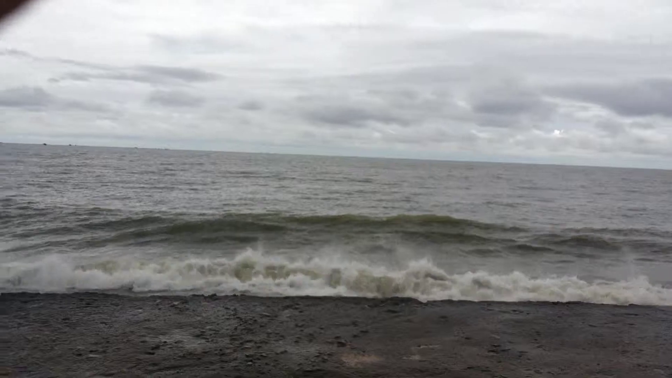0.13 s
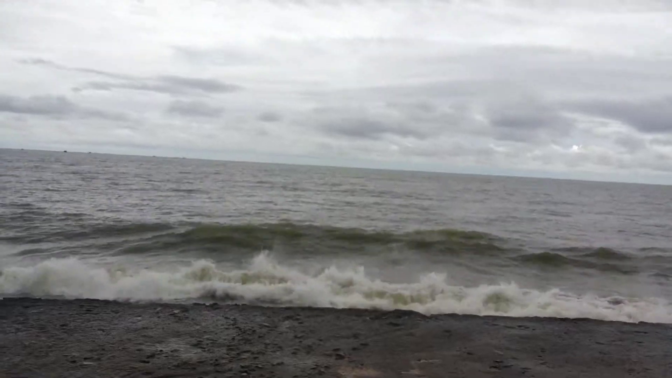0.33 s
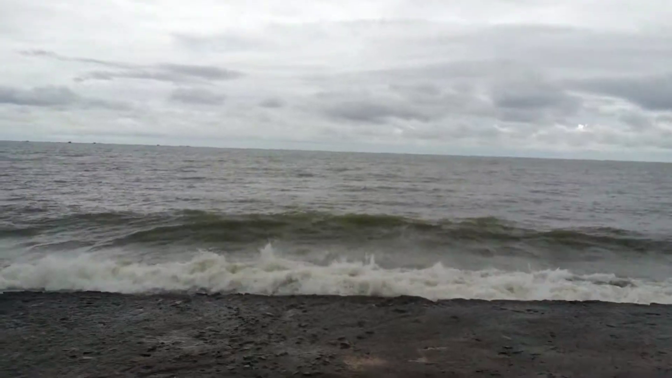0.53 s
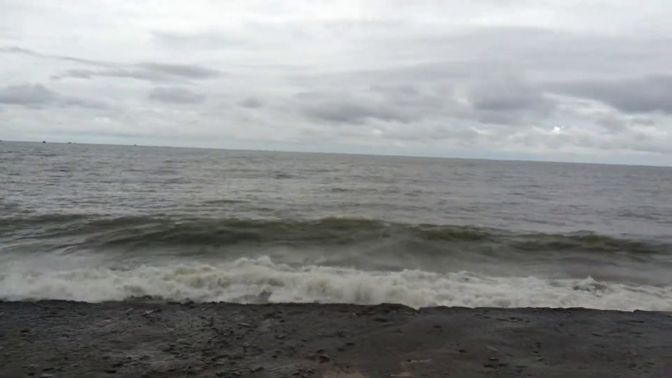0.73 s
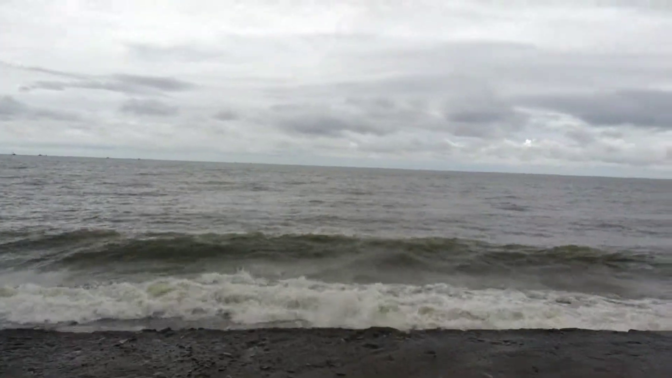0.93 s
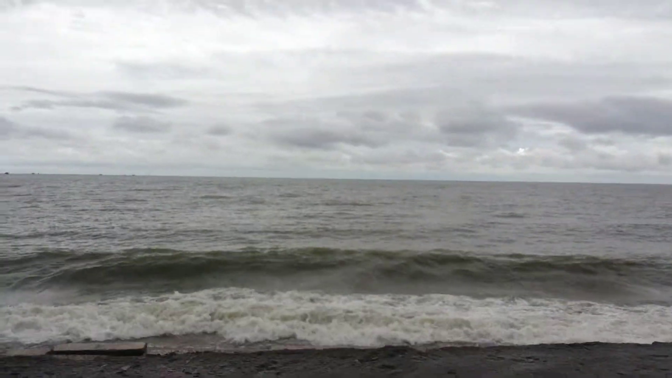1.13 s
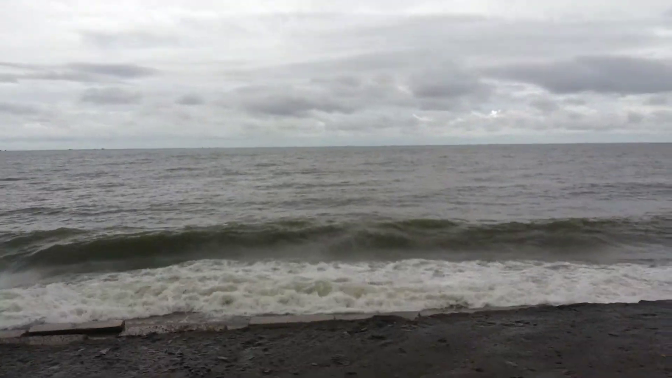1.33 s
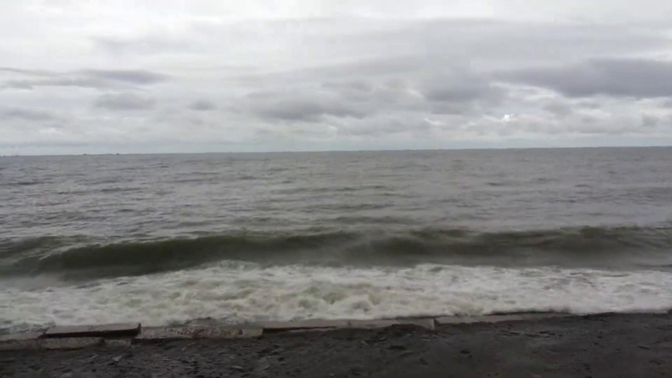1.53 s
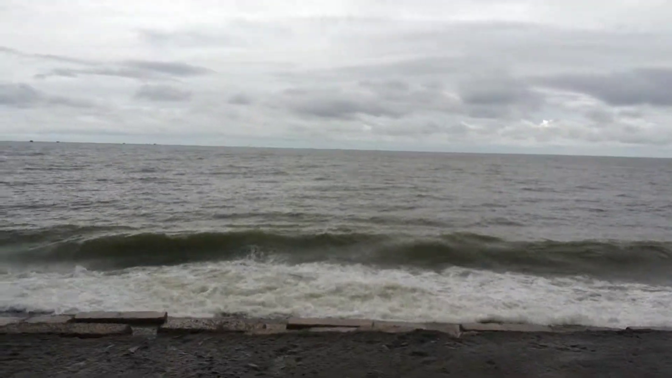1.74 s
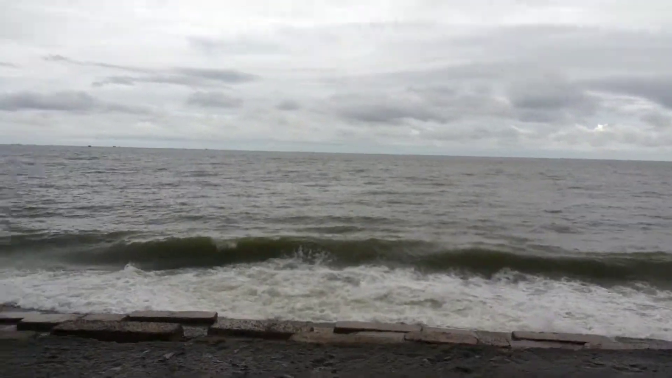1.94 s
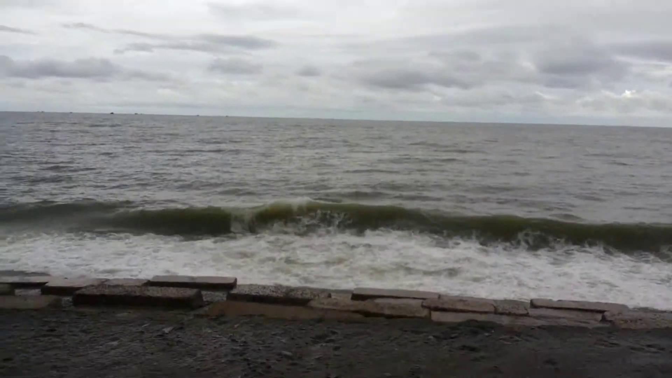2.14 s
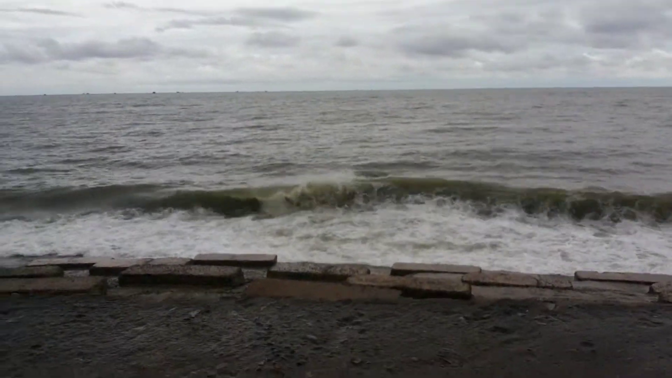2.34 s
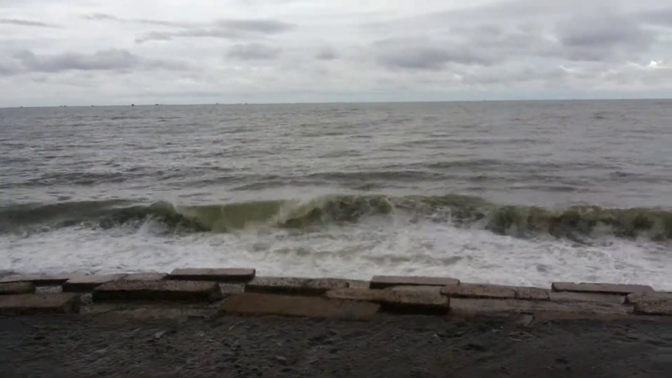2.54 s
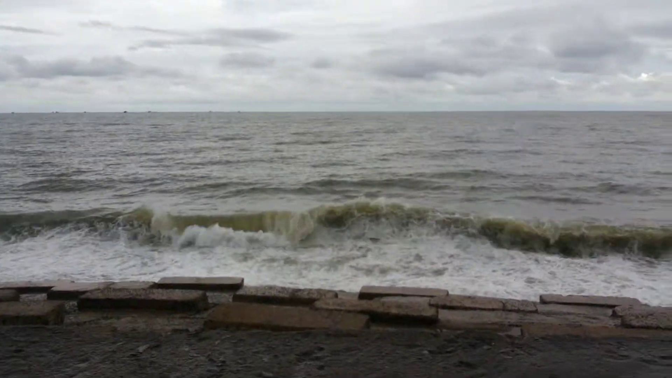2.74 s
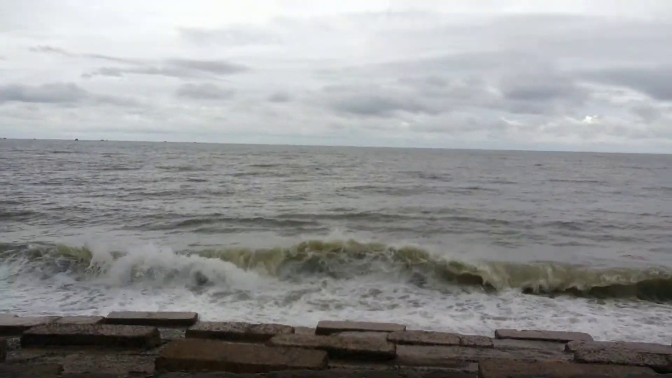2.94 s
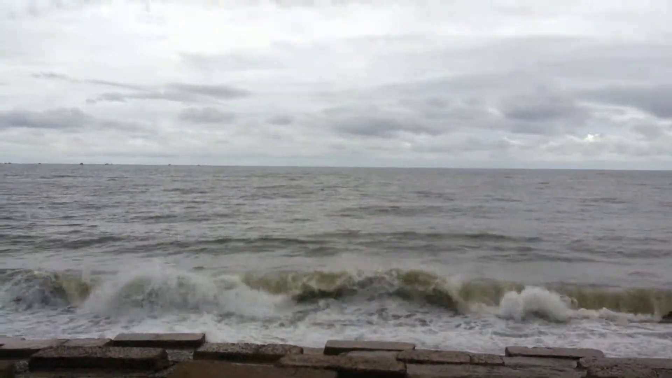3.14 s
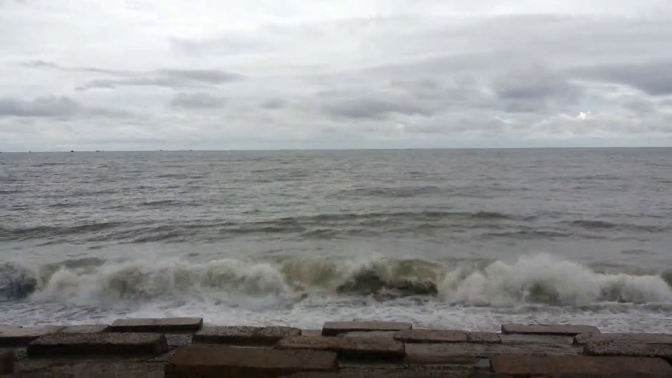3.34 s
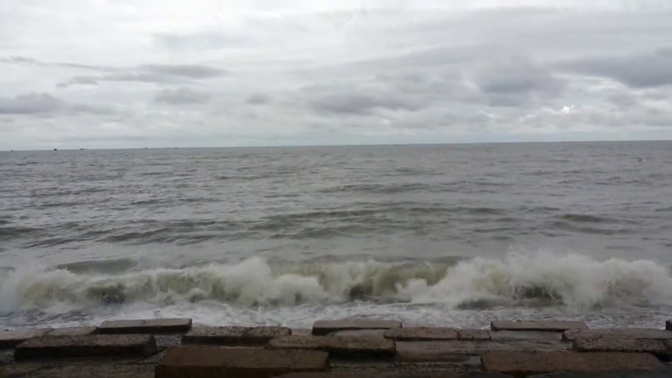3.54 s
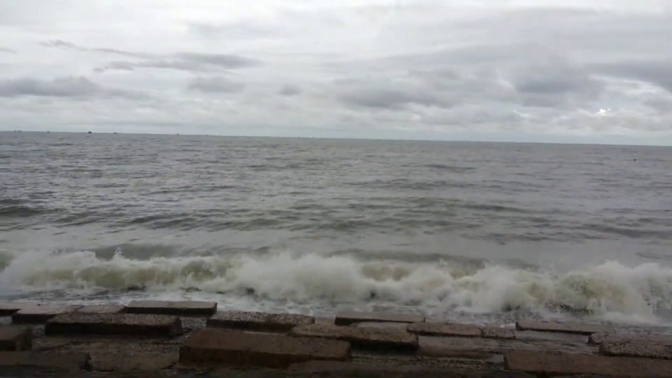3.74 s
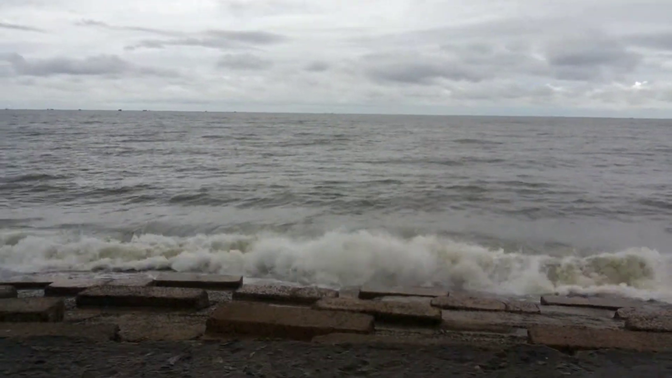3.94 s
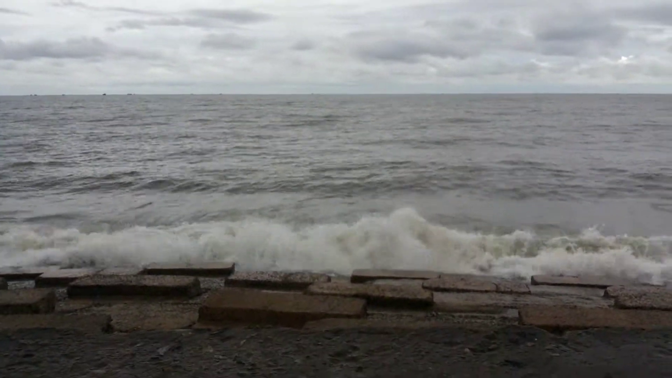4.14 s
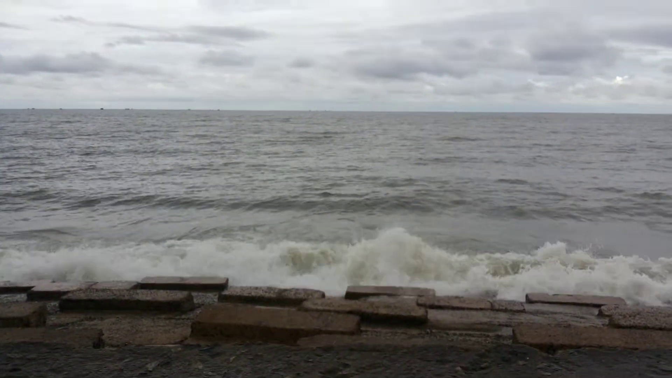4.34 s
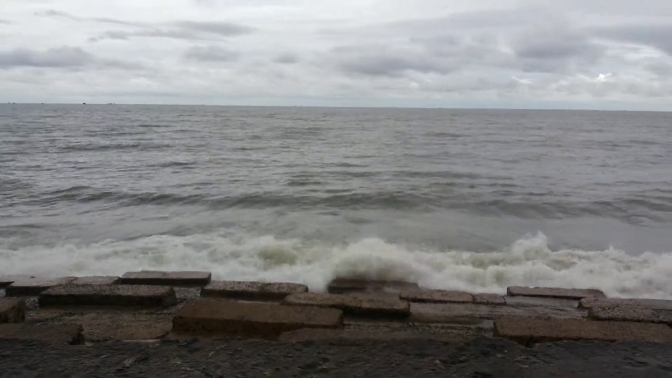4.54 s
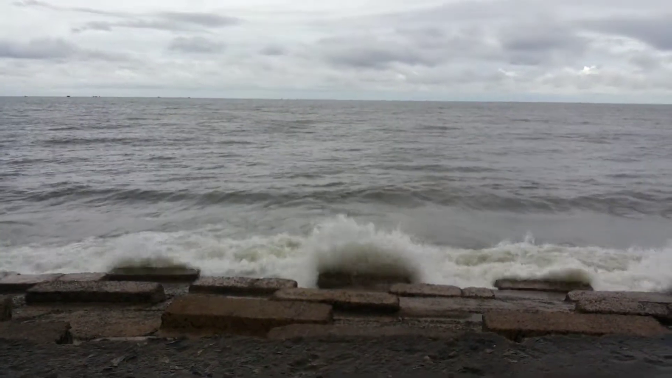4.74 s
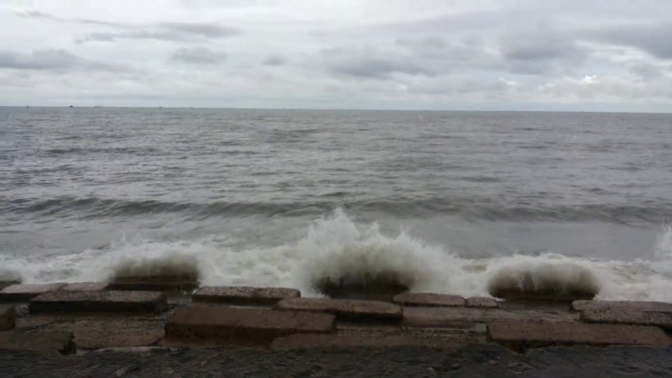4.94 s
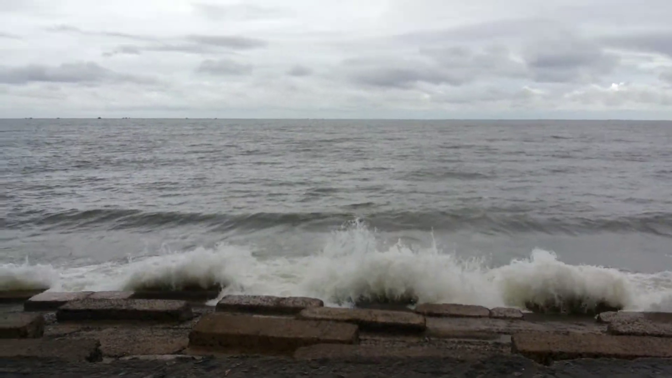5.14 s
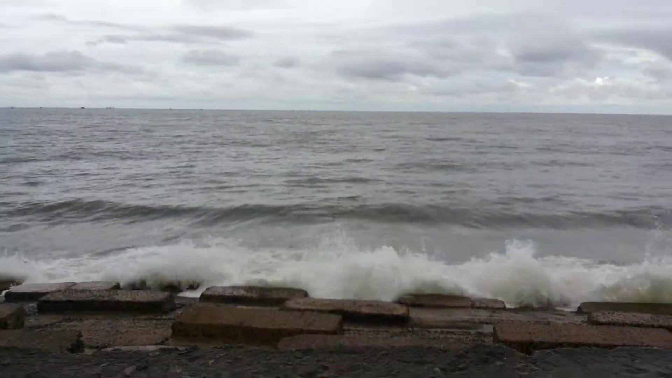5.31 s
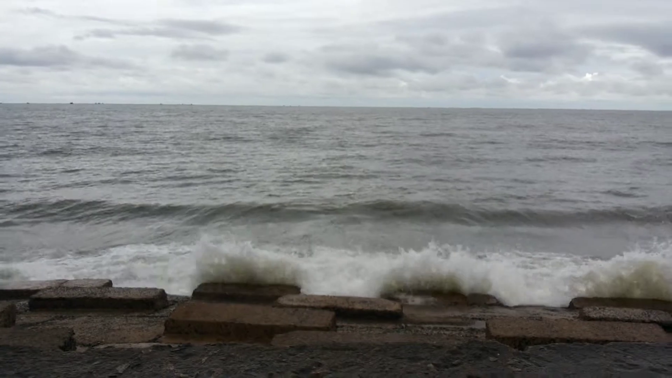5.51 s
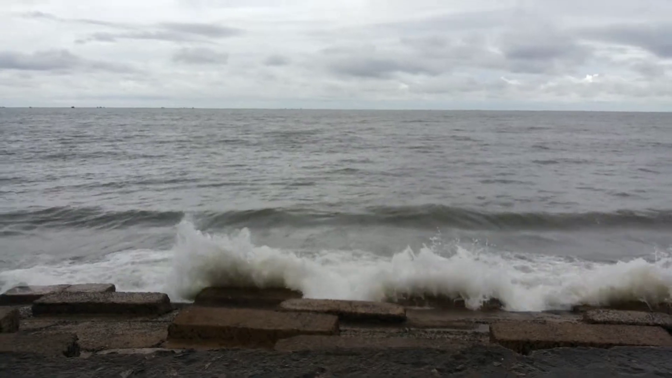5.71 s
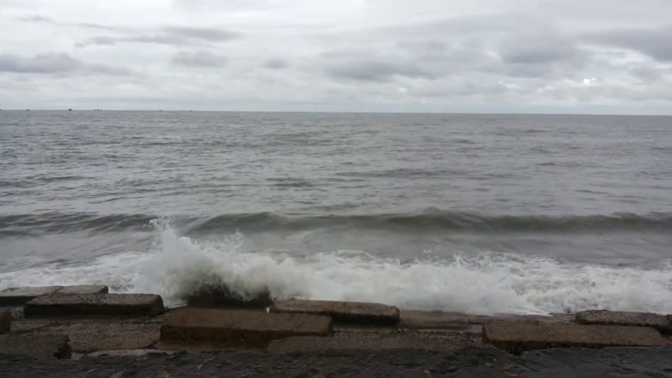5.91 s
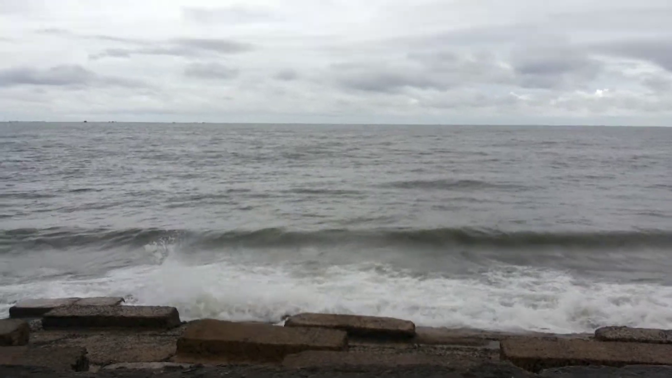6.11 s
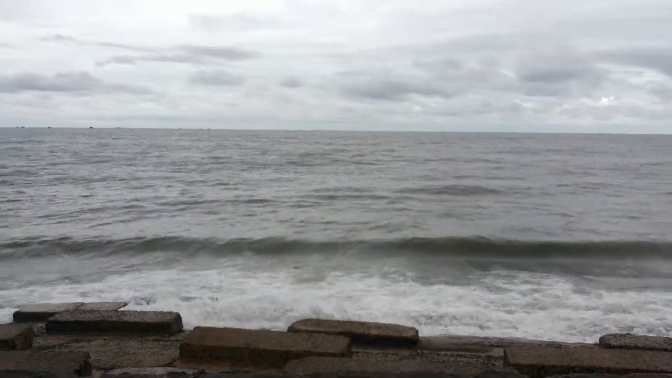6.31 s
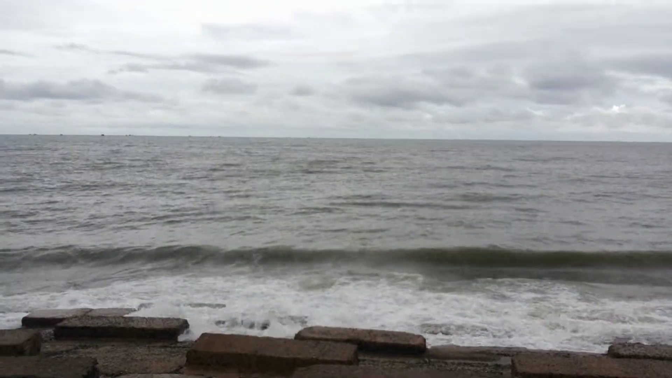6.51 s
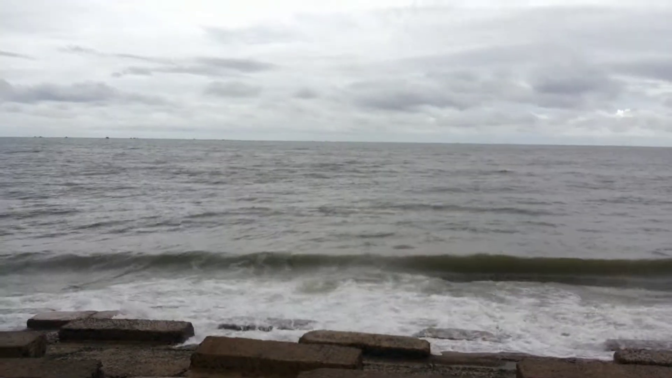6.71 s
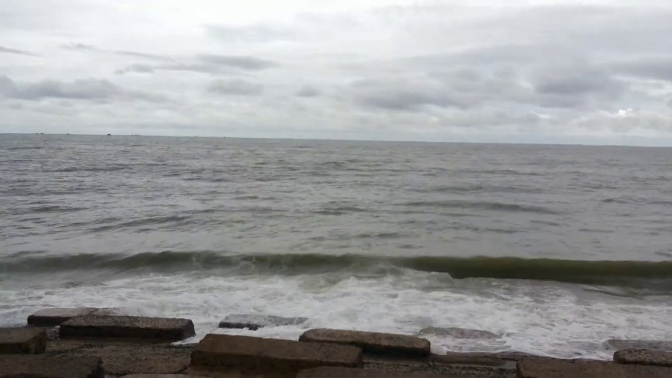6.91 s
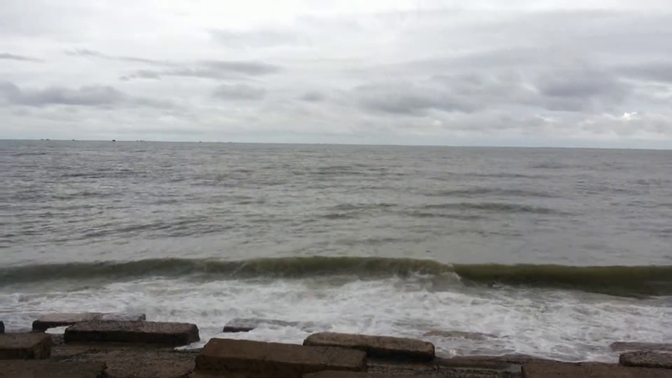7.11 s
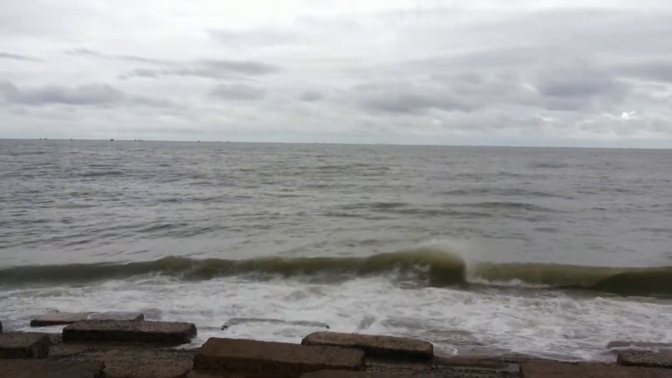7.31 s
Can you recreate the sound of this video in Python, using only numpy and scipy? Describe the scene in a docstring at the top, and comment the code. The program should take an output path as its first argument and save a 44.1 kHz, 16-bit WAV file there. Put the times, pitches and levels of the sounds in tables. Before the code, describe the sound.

On a windy shore, a single microphone picks up churning, hissing sea surf and irregular low thumps of wind. A few gritty shoe scuffs pass nearby, followed by one hollow stony knock with a brief grind. A wave crashes and swells, throwing spray, then water slaps against the seawall slabs. Near the end the hardest gusts buffet the microphone and the surf eases.

```python
"""Surf washes up a stone seawall; the next wave breaks and slaps against the slabs.
Air pockets roar, smaller bubbles churn and wash, foam fizzes, falling water sprays.
Gusts hit the single microphone in short puffs and overload it. Close by, shoes scuff
over grit and something hollow, perhaps a loose slab, knocks and scrapes."""
import sys
import numpy as np
from scipy import signal
from scipy.fft import rfft, irfft, next_fast_len
from scipy.io import wavfile
from scipy.ndimage import uniform_filter1d, map_coordinates

SR = 44100
rng = np.random.default_rng(int(sys.argv[2]) if len(sys.argv) > 2 else 0)


def log_audio(samples):
    """Write samples as a 16-bit WAV file to the path given in sys.argv[1]."""
    # one column per channel
    frames = np.atleast_2d(samples).T
    # limit to full scale, then quantise
    limited = np.clip(frames, -1, 1)
    pcm = np.round(limited * 32767).astype(np.int16)
    wavfile.write(sys.argv[1], SR, pcm)


N = 324576
TIME_S = np.arange(N) / SR
SPLASH_ATTACK_S = .014

# surf strength; one wave washes out, the next breaks and drains: t/s, level/dB
SURF_LEVEL = [(.44, -27.5), (1.15, -27), (1.6, -31.5), (2.15, -28.5), (2.6, -32), (2.92, -25.5),
              (3.06, -27), (3.45, -22.5), (4.0, -24.5), (4.65, -23), (5.24, -30), (5.6, -28.5),
              (6.3, -27.5), (6.8, -30), (7.08, -31.5), (7.3, -30.5)]
# foam bursting behind each wave: t/s, level/dB
FOAM_LEVEL = [(.44, -36), (1.1, -30.5), (1.6, -32.5), (2.25, -29), (2.55, -31.5), (3.8, -30), (4.65, -30),
              (5.2, -34.5), (6.7, -35), (7.1, -38.5)]
# spray from wash-up, breaking wave and wall slap: start/s, build-up/s, peak level/dB, fall/s
SPRAY_SURGES = [(.4, .35, -35.5, 0.89), (3.095, 0.55, -26, 0.53), (5.39, 0.12, -33.5, .5)]
# water landing on sea or wall: start/s, lift/dB, length/s
SPLASHES = [(0.708, 3.5, 0.11), (3.09, 2, 0.12), (3.31, 1.5, .05), (3.573, 2.5, 0.063), (3.748, 3, 0.1),
            (4.046, 1, 0.07), (4.946, 2.5, 0.075), (5.39, 4.5, .26), (5.868, 2, 0.18), (6.171, 3.5, .075)]
# gusts: centre/s, level/dB, length/s
GUSTS = [(0.793, -16, 0.026), (0.883, -27, 0.075), (1.108, -21, 0.089), (1.266, -23.5, 0.043),
         (1.498, -29, 0.065), (1.802, -15, 0.074), (2.053, -21.5, 0.16), (2.335, -24.5, 0.03),
         (3.55, -26, 0.1), (4.417, -20.5, 0.092), (4.65, -30.5, 0.26), (4.974, -22.5, 0.055),
         (5.63, -18.5, 0.17), (5.773, -24, 0.02), (5.911, -17, 0.064), (5.991, -10, 0.044),
         (6.035, -11, 0.032), (6.229, -17, 0.16), (6.608, -19.5, .19)]
# hardest single eddies: t/s, level/dB
THUMPS = [(.729, -11.5), (1.17, -13), (1.825, -6.5), (2.025, -8), (2.038, -15), (3.477, -14.5),
          (3.507, -13.5), (5.524, -10.5), (5.62, -12), (5.685, -8.5), (5.989, -3), (6.046, -5.5),
          (6.235, -8.5), (6.259, -5.5), (6.278, -8), (6.468, -15), (6.591, -9)]
# sole strokes: peak/s, level/dB, rise/s, fall/s
SCUFFS = [(1.769, -18, 0.017, 0.043), (1.85, -24.5, .015, 0.047), (2.082, -18, 0.029, 0.016),
          (2.135, -23.5, .012, 0.02), (2.746, -21, 0.0047, 0.027), (2.822, -19, 0.024, 0.046)]
# hollow slab modes: base f/Hz, base width/Hz, gain/dB
SLAB_MODES = [(345, 84, 2.5), (743, 60, 1), (1380, 30, 3.5), (1690, 40, -3), (1850, 40, 0.5),
              (2750, 150, -3), (3310, 74, -6)]
# longest slab overtones: f/Hz, level/dB, t60/s
SLAB_OVERTONES = [(1300, -22, 0.55), (1650, -21.5, 0.7)]

# noise spectra: f/Hz, relative level/dB
ROAR_SPECTRUM = [(25, -64), (60, -17), (120, -5), (240, 0.5), (350, -2), (500, -6.5), (700, -5.5),
                 (950, -9.5), (1400, -20), (3000, -46)]  # big air pockets
CHURN_SPECTRUM = [(500, -13), (900, -5), (1100, -3), (1380, -1.5), (1650, 1), (1950, -2), (2600, -11.5),
                  (5000, -52)]  # medium bubbles
WASH_SPECTRUM = [(1200, -35), (1900, -8.5), (2300, -1), (2750, 0.5), (3300, -2), (4200, -7), (6500, -18.5),
                 (10000, -32)]  # small bubbles
FIZZ_SPECTRUM = [(3500, -21), (4800, -1.5), (5600, 1), (7000, -2), (8400, -7), (9700, -8), (11000, -12.5),
                 (13000, -19), (15700, -37)]  # bursting foam
SPRAY_SPECTRUM = [(1800, -27), (2500, -13), (3400, 0), (4200, 2), (4800, -11.5), (6800, -16), (8500, -27),
                  (11500, -21), (15700, -33)]  # falling water
BUFFET_SPECTRUM = [(20, -43), (50, -8), (100, -5.5), (190, 3), (340, 0), (480, -7), (720, -20), (1200, -31),
                   (5000, -49)]  # eddies on the microphone
TEAR_SPECTRUM = [(150, -55), (450, 10.5), (750, 2), (1300, -14.5), (2200, -41), (6000, -39)]  # strongest eddies
GRIT_SPECTRUM = [(1000, -12), (2100, -9), (2800, 2), (3600, -2.5), (5500, -3.5), (7500, -5.5), (10000, -10),
                 (12500, -26), (15700, -36)]  # grit under a sole


def surf():
    """Air pockets roar, smaller bubbles churn and wash, bursting foam fizzes, falling water sprays."""
    usual_db, spent_at_s, fade_db_per_s = -27, 5.8, 0.5
    strength_db = np.interp(TIME_S, *np.transpose(SURF_LEVEL))
    foam_db = np.interp(TIME_S, *np.transpose(FOAM_LEVEL))
    lift_db = splash_lift_db()
    swing_db = strength_db - usual_db
    slosh = wobble(rate_hz=21.93)  # small splashes lift all bubble sizes together
    spent_db = fade_db_per_s * np.clip(TIME_S - spent_at_s, 0, 1)  # big pockets die out first
    roar_db = -27.5 + swing_db + 0.94 * lift_db - spent_db + 1.3 * slosh + 0.58 * wobble(rate_hz=14)
    roar = amp(roar_db) * coloured(patchy(depth_db=1.0), ROAR_SPECTRUM)
    drops = bubbles(centre_hz=2302, decay_cycles=5.1, spread_db=1.5, count=9000)
    churn_db = -33 + 0.77 * (swing_db + lift_db) + 0.22 * slosh
    churn = amp(churn_db) * coloured(patchy(depth_db=0.0) + 0.19 * drops, CHURN_SPECTRUM)
    wash_db = strength_db + lift_db - 0.34 + 0.63 * slosh
    wash = amp(wash_db) * coloured(patchy(depth_db=1.0) + 0.21 * drops, WASH_SPECTRUM)
    foam = bubbles(centre_hz=6800, decay_cycles=1.9, spread_db=3.5, count=9000)
    fizz_db = foam_db + 0.78 * lift_db + 0.4 * slosh
    fizz = amp(fizz_db) * coloured(patchy(depth_db=1.5) + 0.34 * foam, FIZZ_SPECTRUM)
    spray_gain = surge_gain() * amp(1.03 * lift_db + wobble(rate_hz=25))
    spray = spray_gain * coloured(patchy(depth_db=1.7), SPRAY_SPECTRUM)
    return roar + churn + wash + fizz + spray


def splash_lift_db(release_s=0.031):
    """Each splash lifts the surf, holds while the water falls, then decays."""
    lift_db = np.zeros(N)
    for start_s, db, length_s in SPLASHES:
        attack = np.clip((TIME_S - start_s) / SPLASH_ATTACK_S, 0, 1)
        release = np.exp(-np.maximum(TIME_S - start_s - length_s, 0) / release_s)
        lift_db += db * attack * release
    return lift_db


def surge_gain(build_db=1.5):
    """Each surge of spray starts abruptly, builds a little and fades."""
    gain = np.zeros(N)
    for start_s, build_s, db, fall_s in SPRAY_SURGES:
        attack = np.clip((TIME_S - start_s) / SPLASH_ATTACK_S, 0, 1)
        build_left = np.clip(1 - (TIME_S - start_s) / build_s, 0, 1)
        after_s = np.maximum(TIME_S - start_s - build_s, 0)
        gain += attack * amp(db - build_db * build_left) * np.exp(-.5 * (after_s / fall_s) ** 2)
    return gain


def bubbles(centre_hz, decay_cycles, spread_db, count):
    """Cloud of damped, slightly rising bubble tones, a few louder than the rest; rms 1."""
    when, size, pitch = rng.random((count, 3)).T
    hz = centre_hz * 3 ** (2 * pitch[:, None] - 1)
    k = np.arange(400)
    cycles = hz * k / SR
    age = cycles / decay_cycles
    chirp = 1 + 0.089 * np.minimum(age, 1)
    ring = np.sin(2 * np.pi * cycles * chirp) * np.exp(-age) * (1 - k / len(k))
    gain = amp(-spread_db * np.log(np.maximum(size, .004)))[:, None]
    index = (when * N).astype(int)[:, None] + k
    return unit(np.bincount(index.ravel(), (gain * ring).ravel(), N)[:N])


def wind(tear_db=2.5, push_limit=.8, vent_hz=98, lowpass_hz=2400):
    """Eddies thump on the microphone; a higher tearing grows with the square of their push."""
    power = gust_power()
    thump = np.sqrt(power) * evened(coloured(rng.standard_normal(N), BUFFET_SPECTRUM), span_s=0.0074)
    tear = amp(tear_db) * power * evened(coloured(rng.standard_normal(N), TEAR_SPECTRUM), span_s=0.0076)
    push = thump + tear
    diaphragm = push / (1 + (push / push_limit) ** 4) ** .25  # overload

    def response(hz):
        """The vent leaks the deepest bass; the treble rolls off."""
        return hz ** 2 / np.hypot(hz ** 2, vent_hz ** 2) / np.hypot(1, (hz / lowpass_hz) ** 2)
    return filtered(diaphragm, response)


def gust_power(edge_s=0.003, wake_db=-10.5, wake_s=0.044):
    """Abrupt, fluttering gusts, each inside a weak, longer stir, plus a few hard eddies."""
    power = np.zeros(N)
    for centre_s, db, length_s in GUSTS:
        outside_s = np.abs(TIME_S - centre_s) - length_s / 2
        core = .5 - .5 * np.tanh(outside_s / edge_s)
        wake = amp(wake_db) ** 2 * np.exp(-np.maximum(outside_s, 0) / wake_s)
        power += amp(db) ** 2 * (core + wake)
    thumps = sum(amp(db) ** 2 * eddy_power(TIME_S - at_s) for at_s, db in THUMPS)
    return power * flutter() + thumps


def flutter(eddies_per_s=65, scatter_db=1.5, smooth_share=0.29):
    """Power of small eddies at uneven gaps in a smooth flow; mean 1."""
    count = int(N / SR * eddies_per_s)
    shift, size = rng.standard_normal((count, 2)).T
    at_s = (np.arange(count) + 0.24 * shift) / eddies_per_s
    hits = np.bincount((at_s * SR).astype(int) % N, amp(scatter_db * size) ** 2, N)
    pulse = eddy_power(np.arange(-SR // 20, SR // 20) / SR)
    stream = np.abs(signal.fftconvolve(hits, pulse, "same"))
    return smooth_share + (1 - smooth_share) * stream / stream.mean()


def eddy_power(offset_s, width_s=0.0062):
    """One eddy pressing on the microphone."""
    return np.exp2(-np.abs(2 * offset_s / width_s) ** 3)


def slab(knock_s=2.74):
    """The slab knocks, rings, then thuds dully under a brief fading grind."""
    knock_hz_db = [(250, -15), (750, 7), (1400, -2), (2800, 4), (5000, -5)]
    thud_hz_db = [(60, -30), (180, 0), (420, -1), (900, -37), (3000, -50)]
    hard = coloured(slab_contact(pitch_ratio=1.057, damping_hz=110), knock_hz_db)
    knock = amp(-10) * swell(knock_s, 0.002, 0.013) * evened(hard, span_s=0.0063)
    age_s = np.maximum(TIME_S - knock_s, 0)
    ring = sum(amp(db - 60 * age_s / t60_s) * np.sin(2 * np.pi * hz * age_s)
               for hz, db, t60_s in SLAB_OVERTONES)
    rough = slab_contact(pitch_ratio=0.97, damping_hz=13)
    grind = amp(-18) * swell(2.78, 0.018, 0.072) * evened(rough, span_s=.03)
    dull = coloured(rng.standard_normal(N), thud_hz_db)
    thud = amp(-19.5) * swell(2.779, .002, .035) * evened(dull, span_s=0.016)
    return knock + ring + grind + thud


def slab_contact(pitch_ratio, damping_hz):
    """Rough contact noise ringing in the slab's modes; rms 1."""
    def modes(hz):
        """Resonances of alternating sign."""
        total = 0
        for k, (mode_hz, width_hz, db) in enumerate(SLAB_MODES):
            loss = 1j * hz * (width_hz + damping_hz)
            total += (-1) ** k * amp(db) * loss / ((pitch_ratio * mode_hz) ** 2 - hz ** 2 + loss)
        return total
    return unit(filtered(rng.standard_normal(N), modes))


def scuffs():
    """Grit crunches and hisses under a sliding sole."""
    strokes = sum(amp(db) * swell(peak_s, rise_s, fall_s) for peak_s, db, rise_s, fall_s in SCUFFS)
    grains = bubbles(centre_hz=4960, decay_cycles=2.0, spread_db=1.0, count=10000)  # short pings
    return strokes * coloured(patchy(depth_db=2.8) + 0.46 * grains, GRIT_SPECTRUM)


def amp(db):
    """Decibels to gain."""
    return 10 ** (np.asarray(db) / 20)


def unit(x):
    """Scale to rms 1."""
    return x / np.sqrt(np.mean(x ** 2) + 1e-20)


def wobble(rate_hz):
    """Smooth random curve with knots at rate_hz."""
    return map_coordinates(rng.standard_normal(int(N * rate_hz / SR) + 4), [TIME_S * rate_hz])


def swell(peak_s, rise_s, fall_s):
    """Asymmetric Gaussian envelope."""
    width_s = np.where(TIME_S < peak_s, rise_s, fall_s)
    return np.exp(-.5 * ((TIME_S - peak_s) / width_s) ** 2)


def filtered(x, response):
    """Apply response(hz) by FFT."""
    size = next_fast_len(N + SR // 4)
    return irfft(rfft(x, size) * response(np.fft.rfftfreq(size, 1 / SR)), size)[:N]


def coloured(x, spectrum):
    """Shape x by (f/Hz, level/dB) points on a log axis; rms 1."""
    knots_hz, db = np.transpose(spectrum)
    return unit(filtered(x, lambda hz: amp(np.interp(np.log(hz + 1), np.log(knots_hz), db))))


def patchy(depth_db):
    """White noise with random gain patches in time and frequency; rms 1."""
    bins = signal.stft(rng.standard_normal(N), nperseg=512)[2]
    patches = uniform_filter1d(rng.standard_normal(bins.shape), size=7, axis=0)
    patches = unit(uniform_filter1d(patches, size=10, axis=1))
    return unit(signal.istft(bins * amp(depth_db * patches), nperseg=512)[1][:N])


def evened(x, span_s):
    """Divide x by its running rms."""
    power = uniform_filter1d(x ** 2, max(int(span_s * SR), 8))
    return x / np.sqrt(np.abs(power) + 1e-3)


def scene():
    """All sources at one microphone, alike in both channels."""
    shore = surf() + wind() + scuffs() + slab()
    return np.array([shore, shore])


def record(dry):
    """The microphone opens a moment late, flattens the strongest peaks and limits the band."""
    open_s, ceiling, hardness, top_hz = .435, .76, 8, 15800
    opened = dry * (TIME_S >= open_s)
    clipped = opened / (1 + np.abs(opened / ceiling) ** hardness) ** (1 / hardness)
    return np.array([filtered(channel, lambda hz: 1 / (1 + (hz / top_hz) ** 200))
                     for channel in clipped])


dry = scene()
out = record(dry)
log_audio(out)
```